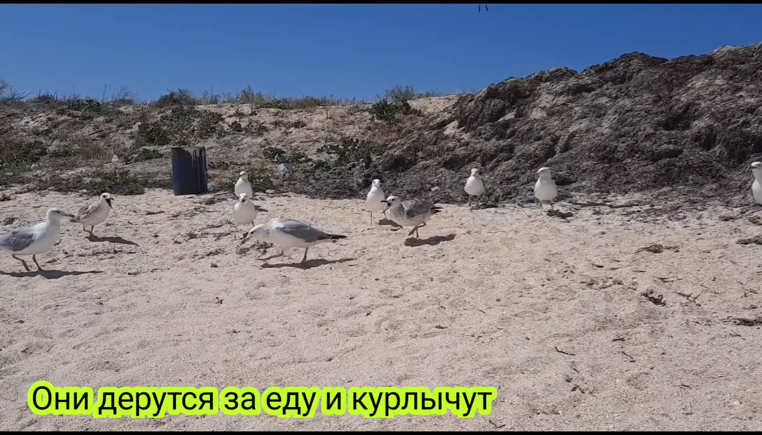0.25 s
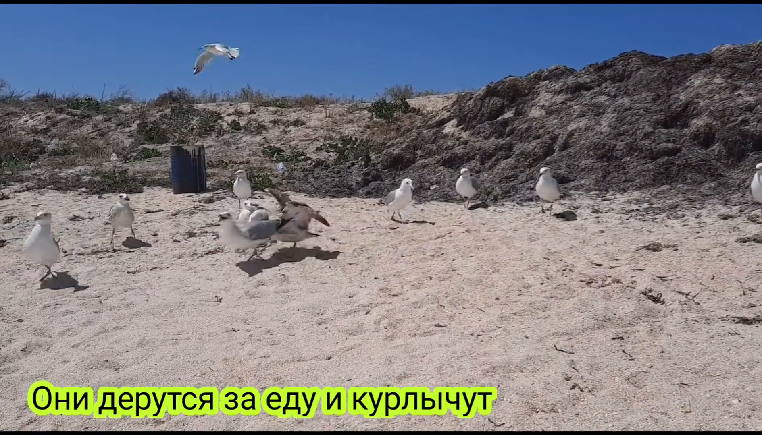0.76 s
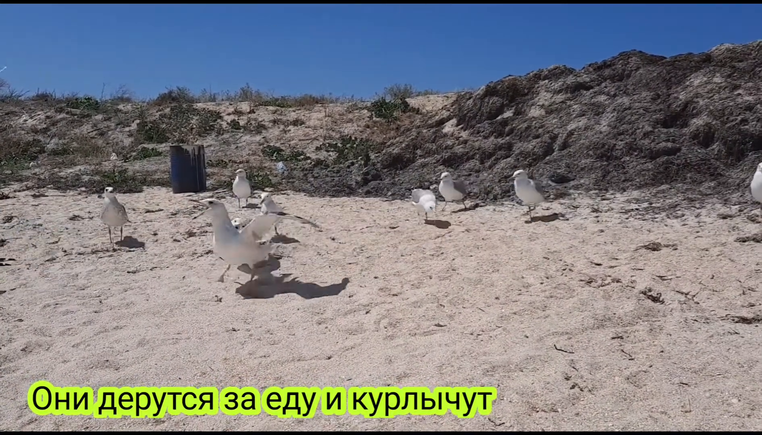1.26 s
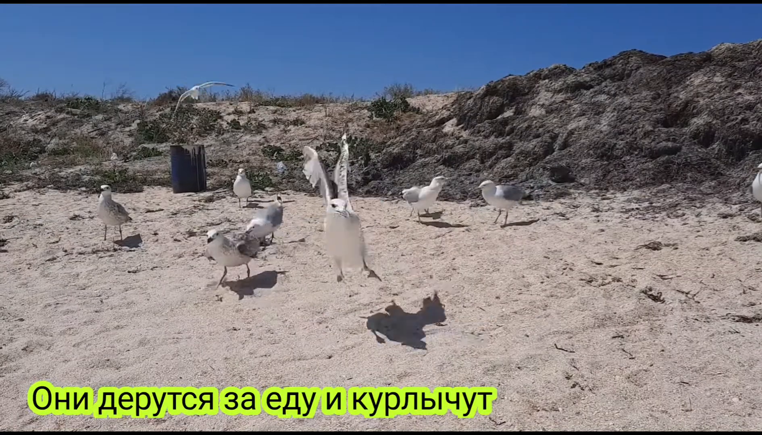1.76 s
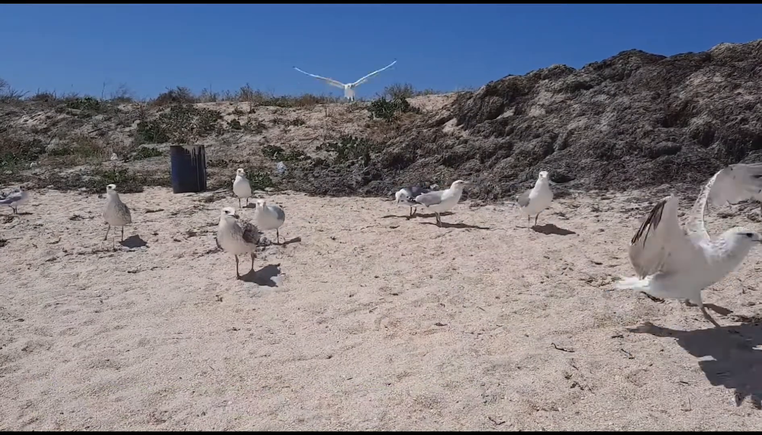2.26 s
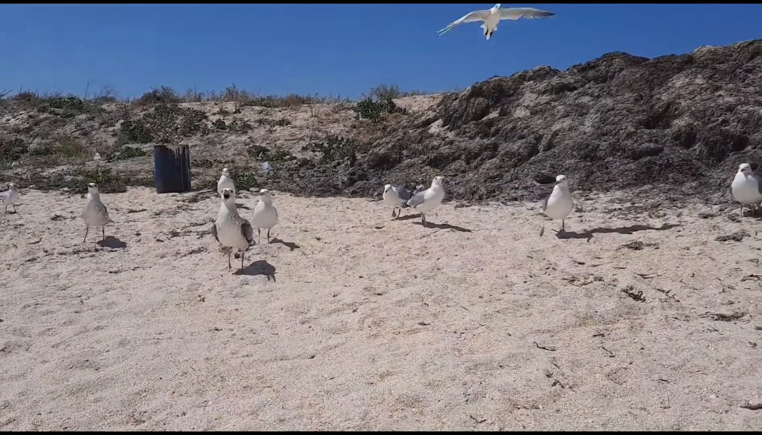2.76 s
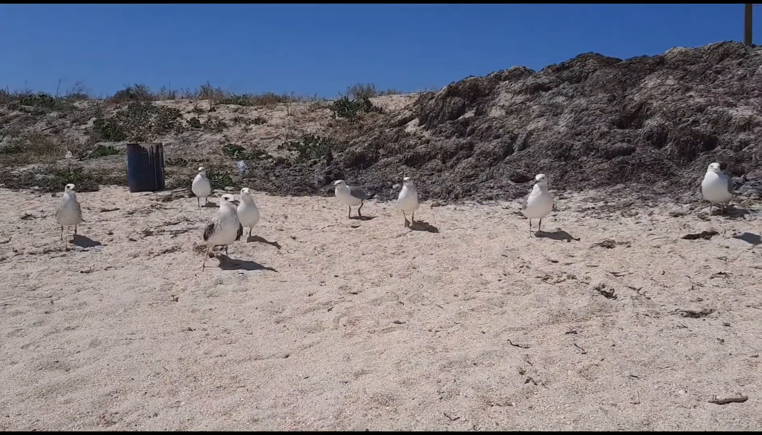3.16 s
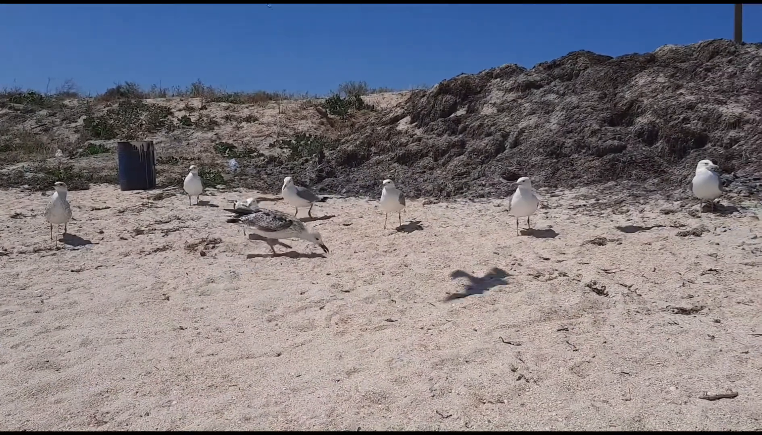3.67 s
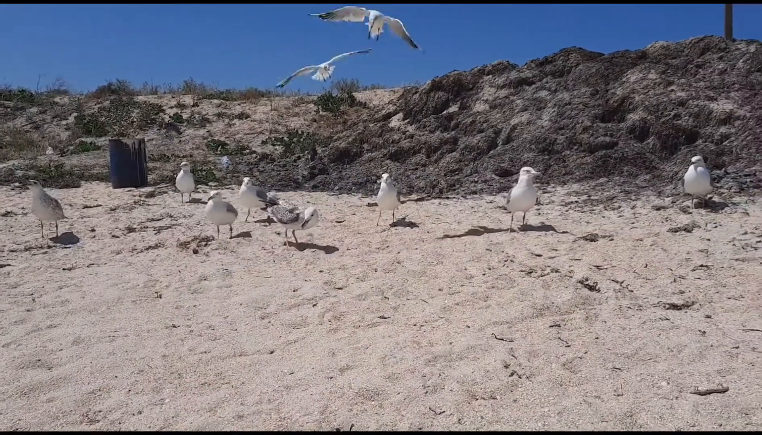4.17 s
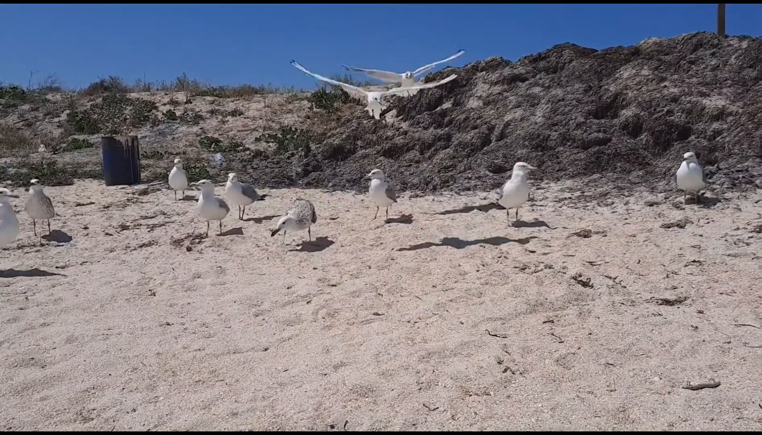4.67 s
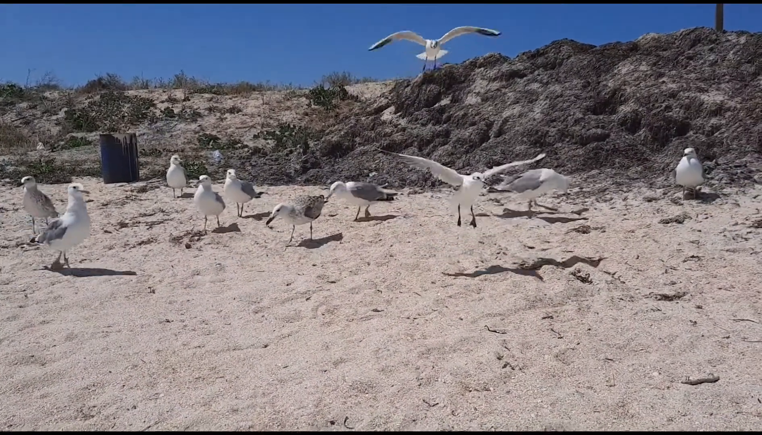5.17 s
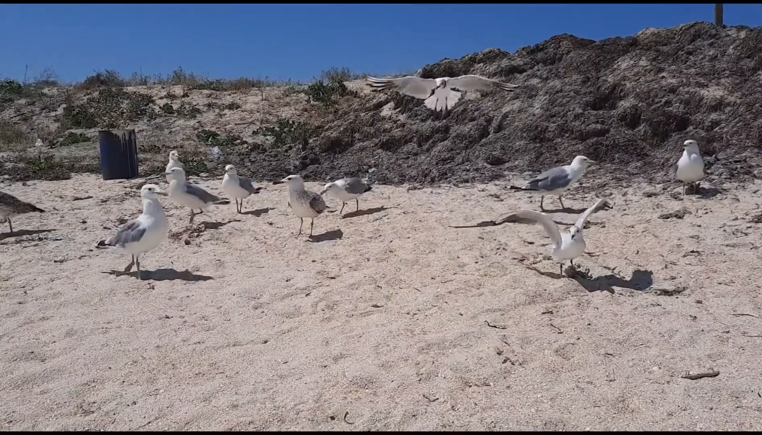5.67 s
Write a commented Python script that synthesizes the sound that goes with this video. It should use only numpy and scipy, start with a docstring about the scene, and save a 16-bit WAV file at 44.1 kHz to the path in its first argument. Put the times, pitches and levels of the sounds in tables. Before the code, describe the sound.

Gulls squabble on a sandy beach: shrill scream, low harsh call, rasping squeal and another scream over soft sea rush and wind rumble.

```python
"""Gulls on a sandy beach

Near gulls give a shrill scream, a low harsh call, a squeal that breaks into a rasp, and another scream.
Whistles mix with second tones into sums and differences, beside slower rough pulsing; harsh calls are harmonic
stacks with tones between. Fainter birds peep and mew as arched notes, soft low tones fall, wings beat as noise
puffs, the sea rushes as two-band noise, and wind rumbles and knocks on two microphone ports."""
import sys
import numpy as np
from scipy import signal
from scipy.fft import rfft, irfft
from scipy.io import wavfile
from scipy.ndimage import map_coordinates

SR = 44100
rng = np.random.default_rng(int(sys.argv[2]) if len(sys.argv) > 2 else 0)


def transcribe(signal):
    """Save signal, clipped to [-1, 1], as a 16-bit WAV file at the path in sys.argv[1]."""
    frames = np.atleast_2d(signal).T
    limited = np.clip(frames, -1, 1)
    pcm = np.round(limited * 32767).astype(np.int16)
    wavfile.write(sys.argv[1], SR, pcm)


N = 261072
T = np.arange(N) / SR

# Spells of breeze: start_s, end_s, first_db, last_db (relative)
BREEZE_SPELLS = [(0.0, 0.7, -51, -54.5), (2.05, 3.25, -57.5, -54.5), (3.43, 4.62, -42.5, -49),
                 (4.78, 5.28, -53.5, -48), (5.43, 5.52, -41, -46), (5.52, 5.92, -55, -56.5)]
LULL_DB = -57.5  # relative level between the spells
# Wind rumble spectrum: frequency_hz, gain_db (relative)
BUFFET_SPECTRUM = [(12, -37), (20, -16), (81, -1), (140, -4.5), (179, -9), (240, -11.5), (310, -11),
                   (530, -120)]
# Gusts that knock on the ports: time_s, peak_db (relative)
PORT_KNOCKS = [(3.462, -19), (3.78, -22.5), (4.218, -29.5), (4.807, -28), (4.988, -32.5), (5.149, -28.5),
               (5.449, -22.5)]
# Knock spectrum: frequency_hz, gain_db (relative)
KNOCK_SPECTRUM = [(25, -57), (70, 11.0), (140, -12), (400, -11.5), (1500, -67), (8000, -80)]
# Level of the shore noise, which also carries a brief wing scuffle near 0.38 s: time_s, level_db (relative)
SHORE_LEVEL = [(0.0, -43), (0.33, -46.5), (0.38, -38.5), (0.54, -45), (3.4, -42), (5.92, -44)]
# Sea spectrum: frequency_hz, gain_db (relative)
SEA_SPECTRUM = [(150, -18.5), (220, -25), (310, 2.5), (400, -1), (500, -4.5), (700, -12), (1200, -14.5),
                (2500, -16), (4000, -21.5), (7000, -24.5), (10000, -31.5), (15500, -33)]
# Wing beats: time_s, peak_db (relative)
WING_BEATS = [(0.393, -33.5), (1.107, -42), (1.689, -44.5), (1.745, -40.5), (1.875, -44), (1.933, -37.5),
              (2.039, -48), (2.231, -38), (3.625, -38.5), (3.682, -40.5), (4.248, -33.5), (4.333, -35)]
# Wing spectrum: frequency_hz, gain_db (relative)
WING_SPECTRUM = [(120, -102), (300, 12.0), (600, 14.5), (1100, -5.0), (3000, -15.0), (12000, -24)]

# The three tables of faint notes give the fundamental and the level before harmonic weights.
# Thin peeps of young birds: start_s, length_s, start_hz, middle_hz, end_hz, level_db
YOUNG_PEEPS = [(3.35, .12, 2550, 2640, 2930, -52), (3.42, .06, 2270, 2370, 2500, -55),
               (3.43, .068, 2550, 2710, 2830, -46), (3.55, .065, 2930, 2820, 2690, -56),
               (3.62, .1, 2790, 2720, 2810, -57), (4.11, .1, 2340, 2430, 2560, -54),
               (4.642, .05, 3150, 3020, 2900, -35), (4.675, .032, 3030, 3200, 3320, -38),
               (4.7, .055, 3340, 3200, 3070, -46), (5.84, .11, 2740, 2870, 3020, -54),
               (5.86, .08, 2430, 2500, 2620, -58)]
# Mews of birds further off: start_s, length_s, start_hz, middle_hz, end_hz, level_db
FAR_MEWS = [(3.425, 0.074, 676, 728, 746, -55), (3.53, .09, 754, 678, 630, -60),
            (3.6, 0.15, 800, 753, 782, -53.5), (3.82, 0.12, 790, 746, 706, -55),
            (4.13, 0.062, 724, 746, 776, -52.5)]
# Soft low falling tones, one of them under the near squeal: start_s, length_s, start_hz, middle_hz, end_hz,
# level_db
LOW_TONES = [(1.42, 0.38, 602, 529, 481, -49), (1.96, 0.19, 452.5, 426, 405, -46.5),
             (2.69, 0.187, 647, 661, 568, -47.5)]

# Place of the near bird: time_s, right_port_lag_ms, left_minus_right_db
NEAR_PLACE = [(.34, 0.22, .5), (.61, .19, 2.5), (.71, 0.16, -3), (.8, .12, -0.5), (2.79, 0.11, 7.5),
              (2.86, .15, 2), (3.1, 0.14, 3.5), (4.35, 0.26, -2), (4.52, 0.24, 0.5)]
# Whistled notes and stretches of notes, in time order: start_s, end_s, first_hz, last_hz, first_db, last_db,
# octave_first_db, octave_last_db
WHISTLE_NOTES = [(0.327, 0.383, 3400, 3315, -26.5, -23, -30, -41),
                 (0.385, 0.458, 4070, 3994, -32, -34, -43, -50),
                 (0.458, 0.59, 4067, 4027, -18, -20, -34.5, -32.5),
                 (0.59, 0.66, 3992, 3870, -21.5, -24.5, -33, -42),
                 (0.66, 0.735, 3882, 3803, -24.5, -30.5, -52, -62),
                 (0.746, 0.785, 2200, 2066, -27, -48, -21, -71),
                 (2.75, 2.82, 3750, 3714, -28.5, -22.5, -48, -34.5),
                 (2.82, 2.968, 3685, 3496, -20, -25.5, -27.5, -36),
                 (3.05, 3.068, 4260, 4090, -16.5, -38, -65, -70),
                 (4.252, 4.272, 3640, 3673, -35, -38, -66, -51),
                 (4.272, 4.296, 3857, 3855, -26, -30, -51, -47),
                 (4.296, 4.385, 4460, 4340, -29, -43, -67, -58),
                 (4.385, 4.505, 4452, 4443, -33, -32.5, -44, -67),
                 (4.505, 4.6, 3815, 3830, -30, -30, -44, -45),
                 (4.6, 4.648, 3835, 3720, -32, -30.5, -39, -46)]
# Second tones sounding beside the whistle, one perhaps a second bird's glide: start_s, end_s, first_hz,
# last_hz, level_db, sum_tone_db, difference_tone_db, roughness (factor)
SECOND_TONES = [(0.43, 0.555, 2435, 2390, -41, -60, -44, 0.95),
                (0.555, 0.595, 2300, 2334, -28, -59, -58, 0.54),
                (0.595, 0.74, 2240, 2166, -34, -38.5, -41, 0.06),
                (2.785, 2.945, 2387, 2205, -41.5, -45.5, -52, 0.65),
                (4.245, 4.275, 2340, 2386, -43, -22.5, -54, 0.27),
                (4.535, 4.62, 3490, 3700, -46.5, -48, -71, 0.17)]
# A note holds its pitch at first and bends late; its level changes mostly early (powers of its progress)
SAG_POWER, FADE_POWER, NOTE_EDGE_S = 1.9, 0.55, 0.0041
# Bursts of rasp: start_s, end_s, first_pulse_hz, last_pulse_hz, level_db, beak_resonance_hz, roughness (factor)
RASP_BURSTS = [(0.317, 0.331, 696, 708, -27, 2580, 1.1), (0.331, 0.366, 704, 688, -35, 4850, 0.1),
               (0.366, 0.384, 684, 692, -26.5, 4800, 0.66), (0.384, 0.405, 681, 704, -31.5, 5500, 0.91),
               (0.405, 0.428, 704, 682, -27, 4950, 0.62), (0.428, 0.46, 700, 694, -28, 4900, 0.94),
               (0.46, 0.6, 697, 678.5, -38, 5140, 0.48), (0.6, 0.72, 685, 663, -38.5, 3400, 0.52),
               (3.05, 3.068, 532, 526, -39, 4300, 0.6), (3.068, 3.16, 522, 508, -43.5, 2650, 1.1),
               (4.25, 4.28, 665, 681, -37, 5440, 0.7), (4.291, 4.315, 636, 637, -30.5, 5110, 0.35),
               (4.315, 4.37, 638, 631, -31, 5310, 0.39), (4.37, 4.475, 632, 641, -36, 3900, 0.4),
               (4.475, 4.507, 636, 670, -33.5, 6220, 0.76), (4.507, 4.64, 644, 632, -53, 4480, 0.21)]
# Open-beak response: frequency_hz, gain_db (relative)
GAPE_SPECTRUM = [(700, -34), (1500, -24.5), (2400, -12), (2900, -14), (3500, -15.5), (5500, -8.5),
                 (7000, -20), (8200, -19), (11000, -44.5), (15000, -22)]
# Breath turbulence spectrum: frequency_hz, gain_db (relative)
HISS_SPECTRUM = [(800, -16), (2200, 6.5), (4500, 5.5), (6000, -1), (8000, -58), (11000, -2.5), (15000, -51)]
# Low harsh calls, one curve each; the last two overlap: time_s, pitch_hz, level_db,
# even_over_odd_harmonics_db, roughness (factor, limited when voiced)
HARSH_CALLS = [
    [(0.737, 572, -42, -3, 0.6), (0.755, 564, -39, -6, 0), (0.79, 515, -40, 12, .4),
     (0.82, 472, -53, 15, 0.3)],
    [(1.11, 507, -60, -7, 0.7), (1.14, 522, -41.5, -18, 0.27), (1.17, 537, -49.5, -11, 0.53),
     (1.185, 556, -33.5, -3, 0.2), (1.21, 578, -31, -4, 0), (1.23, 643.6, -31.5, -5, 0.42),
     (1.248, 616, -27, 9, 0.22), (1.29, 609.6, -25.5, 18, 0.05), (1.32, 617, -29.5, 5, 0.33),
     (1.368, 603.4, -24, 24, 0.15), (1.387, 683.5, -32, 6, 0.2), (1.41, 599.5, -31, 5, 0.37),
     (1.435, 586, -28, -3, 0.29), (1.455, 598.4, -29, 7, 0.55), (1.476, 631, -33, 11, 0.38),
     (1.493, 568, -28, -3, 0.23), (1.52, 542, -37.5, 11, 0.74), (1.565, 499.4, -47, -8, 0.55)],
    [(2.675, 491, -58, -5, 0.57), (2.695, 536, -48, 14, 0.5), (2.72, 638.4, -53, -2, 0.44),
     (2.89, 629, -45, -9, 0.65), (2.93, 607, -45.5, 5, 0.33), (3.08, 587, -45.5, -4, 0.52),
     (3.12, 578, -38, -1, .22), (3.152, 558, -31, 9, 0.42), (3.17, 551, -43, -5, 0.5),
     (3.21, 537, -44, 17, 0.2), (3.24, 507, -52, 3, 0.65)],
    [(2.98, 597, -49, 3, 0.03), (3.0, 578, -39, -10, 0.25), (3.042, 547, -38, 0, 0.33),
     (3.058, 528, -27, 6, 0.25), (3.075, 522, -35.5, -3, 0.5), (3.105, 519, -30, -5, 0.3),
     (3.135, 500, -42, -6, 0.48)],
]
# Throat response: frequency_hz, gain_db (relative)
THROAT_SPECTRUM = [(550, -2.5), (950, -30), (1150, 8.5), (1350, 6.5), (1700, 5.5), (2250, 6), (2550, -5.5),
                   (2900, -11), (3250, -14), (3700, -3), (4300, -2), (5000, -18), (7500, -37), (14000, -54)]
TOP_HZ = 15400


def undb(db):
    """Logarithmic level: decibels become amplitude gain."""
    return 10 ** (np.asarray(db) / 20)


def unit(x):
    """Power normalization: scale to an rms of 1."""
    return x / np.sqrt(np.mean(x ** 2))


def curves(table):
    """Linear interpolation: join every column of a table in time."""
    time_s, *columns = np.transpose(table)
    return [np.interp(T, time_s, column) for column in columns]


def gain_at(spectrum, hz):
    """Frequency response: interpolate decibels along logarithmic frequency."""
    frequency_hz, gain_db = np.transpose(spectrum)
    return undb(np.interp(np.log(hz + 1), np.log(frequency_hz), gain_db))


def noise(spectrum):
    """Spectral shaping: white noise takes on a given colour, at rms 1."""
    white = rfft(rng.standard_normal(N))
    frequency_hz = np.arange(N // 2 + 1) * SR / N
    return unit(irfft(white * gain_at(spectrum, frequency_hz), N))


def walk(rate_hz, t=T):
    """Random fluctuation: lines join random values into a wander with a spread near 1."""
    steps = rng.standard_normal(len(t) // 4)
    return 1.198 * np.interp((t - t[0]) * rate_hz, np.arange(len(steps)), steps)


def turn(hz):
    """Phase accumulation: integrate the instantaneous frequency."""
    return 2 * np.pi * np.cumsum(hz) / SR


def ease(x, time_s):
    """First-order lag: a control approaches its target exponentially."""
    keep = np.exp(-1 / (time_s * SR))
    return signal.lfilter([1 - keep], [1, -keep], x + 1e-12)


def notes(table):
    """Note articulation: the gate, the progress 0-1 and the remaining columns of the nearest note."""
    rows = np.array(table)
    midgaps_s = (rows[:-1, 1] + rows[1:, 0]) / 2
    start, end, *columns = rows[np.searchsorted(midgaps_s, T)].T
    gate = (T >= start) & (T < end)
    progress = np.clip((T - start) / (end - start), 0, 1)
    return [gate, progress, *columns]


def voiced(on, db):
    """Two-way smoothing: lags forward and backward round a note's attack and release."""
    forward = ease(on * undb(db), NOTE_EDGE_S)
    return ease(forward[::-1], NOTE_EDGE_S)[::-1]


def ports(x, lag_ms, pan_db):
    """Arrival-time and level differences: the sound reaches the right port later, at another level."""
    late = map_coordinates(x, [np.arange(len(x)) - lag_ms * SR / 1000], order=3)
    return np.array([x * undb(pan_db / 2), late * undb(-pan_db / 2)])


def wind(pan_db=-7, gust_db=3, freshen_s=0.0027):
    """Turbulent pressure: eddies rumble on each port separately and swell on both together."""
    on, progress, first_db, last_db = notes(BREEZE_SPELLS)
    breeze = ease(on * undb(first_db + (last_db - first_db) * progress), freshen_s)
    strength = np.maximum(undb(LULL_DB), breeze) * undb(3.2 * walk(12))
    eddies = [noise(BUFFET_SPECTRUM) * undb(side * pan_db / 2 + gust_db * walk(28)) for side in (1, -1)]
    return strength * np.array(eddies)


def shore(level_db=1, diffuse_db=0, lag_ms=0.4105, pan_db=3.0, flicker_db=3.5):
    """Direct and diffuse fields: sea noise from the left churns in its low part, its hiss smoother."""
    db, = curves(SHORE_LEVEL)
    diffuse = undb(diffuse_db) * np.array([noise(SEA_SPECTRUM), noise(SEA_SPECTRUM)])
    both = unit(ports(noise(SEA_SPECTRUM), lag_ms, pan_db) + diffuse)
    low = signal.sosfiltfilt(signal.butter(2, 900, fs=SR, output="sos"), both)
    churn = undb(db + flicker_db * np.array([walk(35), walk(35)]))
    hiss = undb((db + np.mean(db)) / 2 + walk(23))  # follows the level only halfway
    return (low * churn + (both - low) * hiss) * undb(level_db)


def puffs(table, spectrum, rise_s, fall_s, level_db, pan_db=0):
    """Transient airflow: noise pushes swell and die exponentially, partly different at each port."""
    envelope = sum(undb(db) * np.exp(-np.maximum((s - T) / rise_s, (T - s) / fall_s)) for s, db in table)
    shared = noise(spectrum)
    sides = [(shared + 3.0 * noise(spectrum)) * undb(side * pan_db / 2) for side in (1, -1)]
    return np.array(sides) * envelope * undb(level_db)


def knocks():
    """Impulsive pressure: gusts strike the ports as low, brief puffs."""
    return puffs(PORT_KNOCKS, KNOCK_SPECTRUM, rise_s=0.004, fall_s=0.011, level_db=-12.0, pan_db=-4.5)


def wings():
    """Displaced air: each wing beat pushes out a brief puff."""
    return puffs(WING_BEATS, WING_SPECTRUM, rise_s=0.0018, fall_s=0.0073, level_db=-3.0)


def dune(x, wet_db=-25, t60_s=0.32, first_s=0.023):
    """Diffuse scattering: sand and the weedy bank return a short faint echo, unlike at each port."""
    t = T[:SR // 2]
    tails = rng.standard_normal((2, len(t))) * np.exp(-np.log(1000) * t / t60_s) * (t > first_s)
    echoes = [signal.fftconvolve(x, tail / np.linalg.norm(tail))[:N] for tail in tails]
    return undb(wet_db) * np.array(echoes)


def arched_notes(table, harmonics_db, jitter):
    """Harmonic synthesis: short arched notes glide as stacks of a few partials."""
    out, wobble = np.zeros(N), 1 + jitter * walk(600)
    for start, length, first_hz, middle_hz, last_hz, db in table:
        on = (T >= start) & (T < start + length)
        progress = (T[on] - start) / length
        glide = np.polyfit([0, .5, 1], [first_hz, middle_hz, last_hz], 2)
        phase = turn(np.polyval(glide, progress) * wobble[on])
        stack = sum(undb(h) * np.sin((k + 1) * phase) for k, h in enumerate(harmonics_db))
        out[on] += np.sqrt(2 * np.abs(np.sin(np.pi * progress))) * undb(db) * stack
    return out


def flock(level_db=-57, count=14):
    """Random superposition: overlapping cries come from birds circling further off."""
    rows = []
    for when, length, pitch, bend in rng.random((count, 4)):
        hz = 640 + 240 * pitch
        slope = 0.278 * (bend - .5)
        first_hz, last_hz = hz * (.96 - slope), hz * (.96 + slope)
        rows.append((3.3 + .8 * when, .04 + .07 * length, first_hz, hz, last_hz, level_db))
    return arched_notes(rows, harmonics_db=[-6, -4, 0, -8, -14, -9, -12], jitter=.009)


def faint_notes():
    """Superposition: peeps, mews, soft low tones and a flurry of cries add together."""
    peeps = arched_notes(YOUNG_PEEPS, harmonics_db=[-10, 0], jitter=.005)
    mews = arched_notes(FAR_MEWS, harmonics_db=[-37, -13.5, 4.5, -31], jitter=0.008)
    low_tones = arched_notes(LOW_TONES, harmonics_db=[0], jitter=0.043)
    return peeps + mews + low_tones + flock()


def squawk(table, jitter=0.048, waver=0.021, shimmer=0.81, half_db=3, air_db=-4, spray_db=-8,
           level_db=0, stray_rad=4, smear_rad=0.21):
    """Period doubling: stronger even harmonics leap an octave; hoarseness adds tones between harmonics."""
    on = (T >= table[0][0]) & (T < table[-1][0])
    t = T[on]
    hz, db, leap_db, rough = (column[on] for column in curves(table))
    rough = np.clip(rough, .1, .7)
    phase = turn(hz * (1 + rough * (jitter * walk(700, t) + waver * walk(115.1, t))))
    voice, power = 0, 0
    for k in np.arange(2, 29) / 2:  # harmonics 1-14 and the half-steps between
        size = gain_at(THROAT_SPECTRUM, k * hz) * (undb(leap_db) if k % 2 == 0 else 1)
        slip = smear_rad * k * rough * walk(350, t)  # upper harmonics blur first
        if k % 1:  # the tones in between come and go, and stray up and down
            size = size * undb(half_db) * rough * walk(150.8, t)
            slip = slip + stray_rad * walk(70, t)
        voice = voice + size * (1 + shimmer * rough * walk(300, t)) * np.cos(k * phase + slip)
        power = power + size ** 2 / 2
    # turbulence puffs once a cycle, partly above the throat resonances
    throat_air = undb(air_db) * noise(THROAT_SPECTRUM)[on]
    spray = undb(spray_db) * noise(HISS_SPECTRUM)[on] / (1 + undb(leap_db))
    air = rough * (throat_air + spray) * (1 + np.cos(phase))
    out = np.zeros(N)
    out[on] = (voice / np.sqrt(power) + air) * undb(db + level_db)
    return out


def rasp(shimmer=0.44, beak_width_hz=600, level_db=0, hiss_db=-10):
    """Source-filter resonance: uneven pulses ring the open beak, with air hissing once a pulse."""
    on, progress, first_hz, last_hz, db, beak_hz, rough = notes(RASP_BURSTS)
    hz = first_hz + (last_hz - first_hz) * progress
    phase = turn(hz * (1 + rough * (.034 * walk(900) + .012 * walk(90))))
    out, power = 0, 0
    for k in range(1, 21):
        resonance = 1 / (1 + (2 * (k * hz - beak_hz) / beak_width_hz) ** 2)
        gain = gain_at(GAPE_SPECTRUM, k * hz) + resonance
        out = out + gain * (1 + shimmer * walk(200)) * np.sin(k * phase + k * k)
        power = power + gain ** 2 / 2
    air = rough * undb(hiss_db) * noise(HISS_SPECTRUM) * (1 + np.cos(phase))
    swing = 1 + .25 * rough * walk(350)
    return (out / np.sqrt(power) + air) * swing * voiced(on, db + level_db)


def whistles(jitter=0.0033, rough_jitter=0.0088, shimmer=0.068, flutter=0.23, third_db=-32,
             fourth_db=-24, hiss_db=-33, octave_lag_s=0.0026):
    """Combination tones: a whistle and the second tone beside it yield sum and difference tones."""
    on, progress, first_hz, last_hz, first_db, last_db, octave_first_db, octave_last_db = notes(WHISTLE_NOTES)
    sag, fade = progress ** SAG_POWER, progress ** FADE_POWER
    hz = first_hz + (last_hz - first_hz) * sag
    tone = voiced(on, first_db + (last_db - first_db) * fade)
    octave_db = octave_first_db + (octave_last_db - octave_first_db) * fade
    octave = ease(voiced(on, octave_db), octave_lag_s)
    (second_on, second_progress, second_first_hz, second_last_hz, second_db, sum_db, difference_db,
     second_rough) = notes(SECOND_TONES)
    second_hz = second_first_hz + (second_last_hz - second_first_hz) * second_progress ** SAG_POWER
    rasp_on, _, pulse_hz, _, rasp_db, _, rough = notes(RASP_BURSTS)
    # the stronger the rasp, the more it shakes the whistle and flanks it with side tones
    shake = np.minimum(voiced(rasp_on, rasp_db) / tone, 1)
    wander = (jitter + rough_jitter * rough * shake) * walk(900) + 0.0011 * walk(70)
    first_phase = turn(hz * (1 + wander))
    second_phase = turn(second_hz * (1 + 0.022 * second_rough * walk(700)))
    swing = 1 + shimmer * walk(440) + flutter * shake * (rough * walk(500) + np.sin(turn(pulse_hz)))
    first = tone * (np.sin(first_phase) + undb(third_db) * np.sin(3 * first_phase))
    first += octave * np.sin(2 * first_phase)
    first += np.sqrt(tone * octave) * undb(fourth_db) * np.sin(4 * first_phase)
    first += np.sqrt(tone) * undb(hiss_db) * noise(HISS_SPECTRUM)
    second = voiced(second_on, second_db) * np.sin(second_phase)
    second += voiced(second_on, sum_db) * np.sin(first_phase + second_phase)
    second += voiced(second_on, difference_db) * np.sin(2 * first_phase - second_phase)
    return np.sqrt(2) * swing * (first + second)


def scene():
    """Linear superposition: wind, sea, wings, faint notes and near gulls add at two ports."""
    lag_ms, pan_db = curves(NEAR_PLACE)
    faint = faint_notes()
    near = whistles() + rasp() + sum(squawk(call) for call in HARSH_CALLS)
    birds = ports(near, lag_ms, pan_db) + ports(faint, lag_ms=0.043, pan_db=-2.5) + dune(near + faint)
    return birds + wings() + knocks() + shore() + wind()


def record(dry):
    """Band limiting: a high-pass thins the deepest rumble and a steep low-pass cuts the top."""
    dry = signal.sosfilt(signal.butter(2, 36, "highpass", fs=SR, output="sos"), dry)
    return signal.sosfilt(signal.ellip(10, .2, 80, TOP_HZ, fs=SR, output="sos"), dry)


dry = scene()
out = record(dry)
transcribe(out)
```